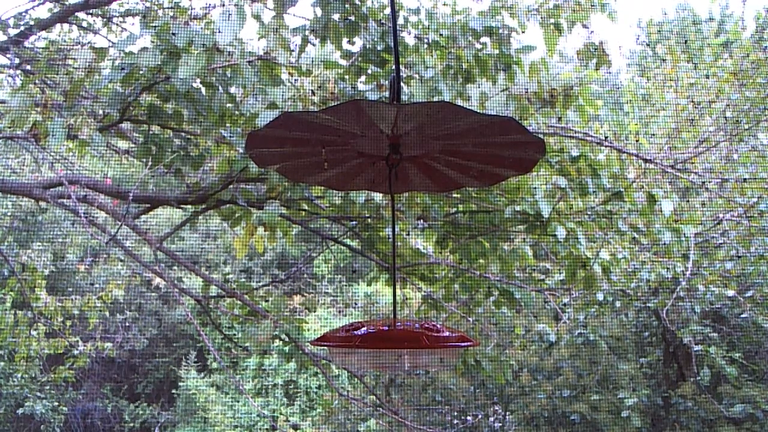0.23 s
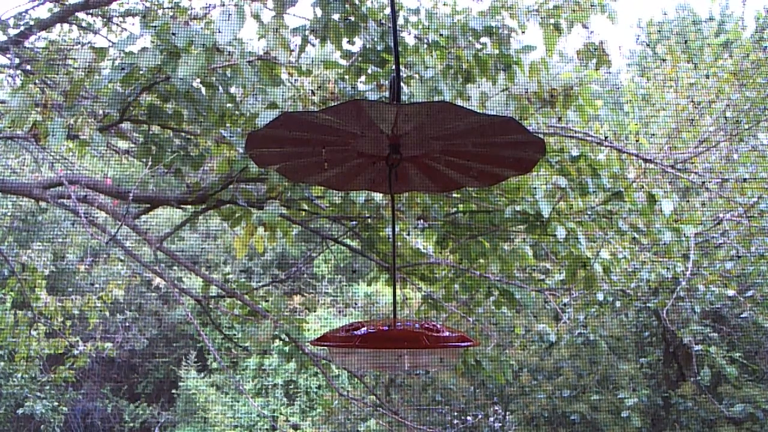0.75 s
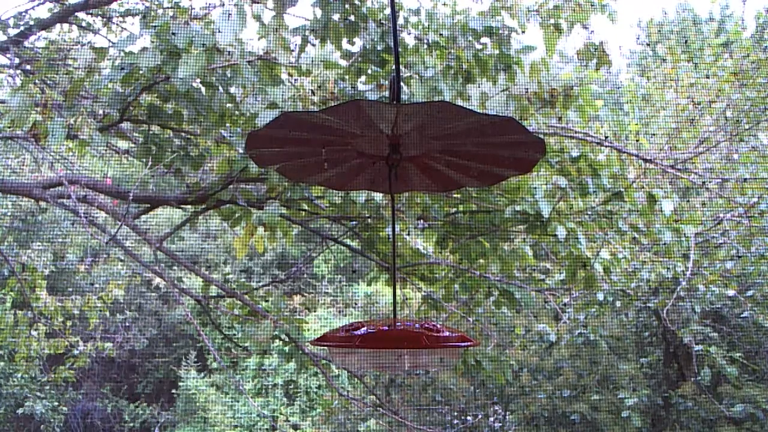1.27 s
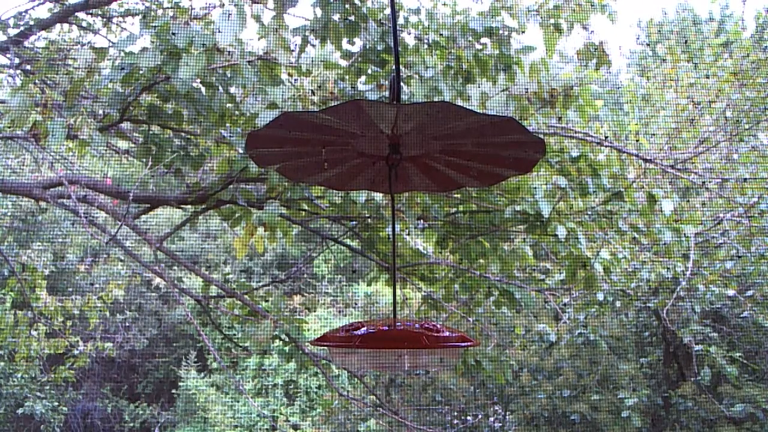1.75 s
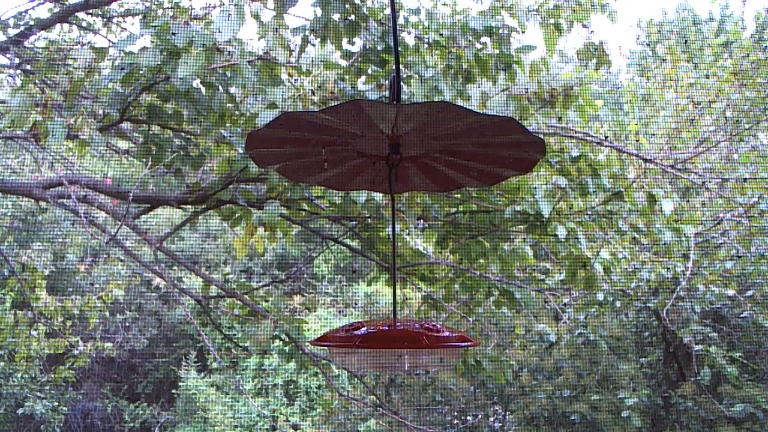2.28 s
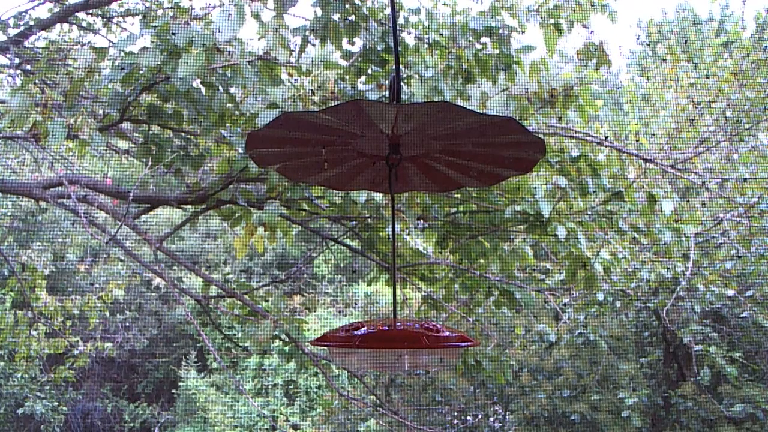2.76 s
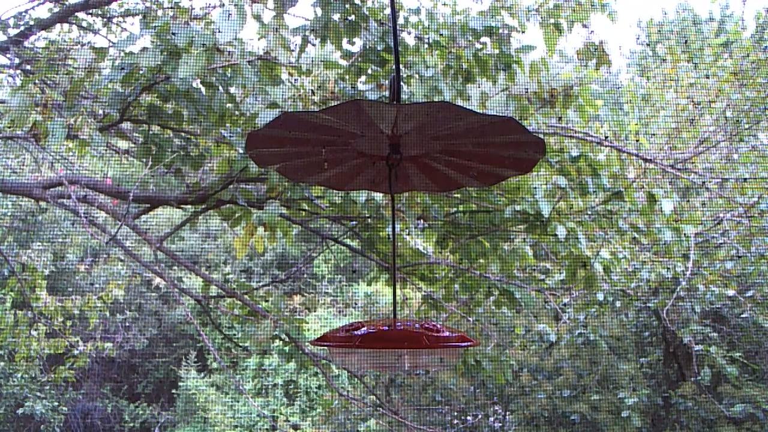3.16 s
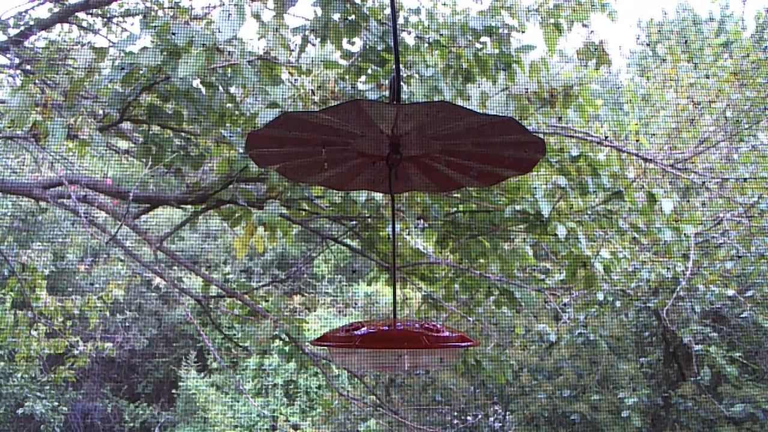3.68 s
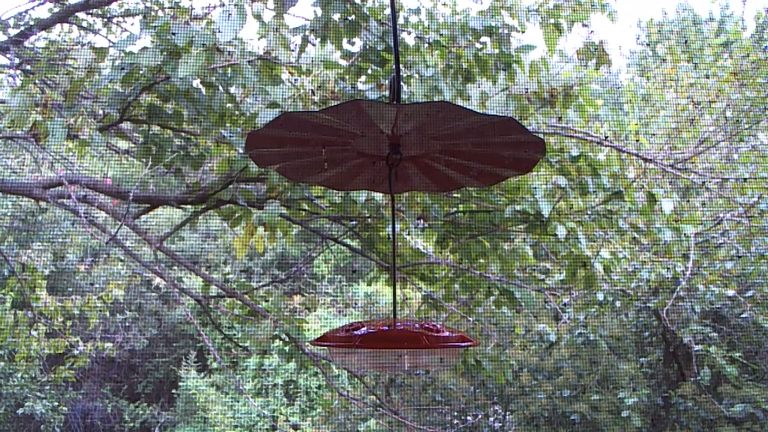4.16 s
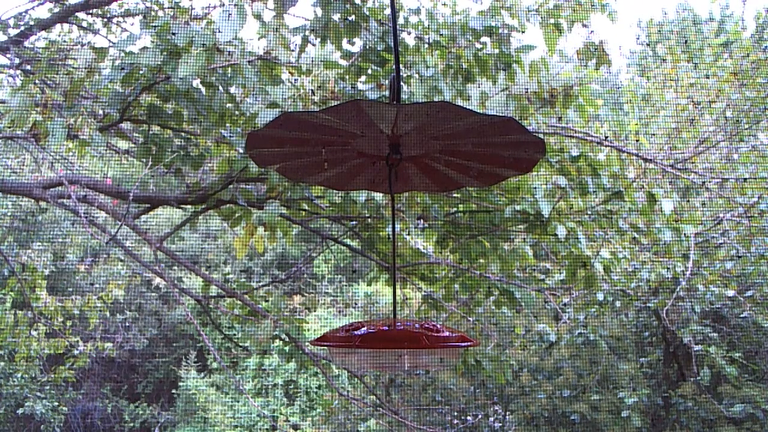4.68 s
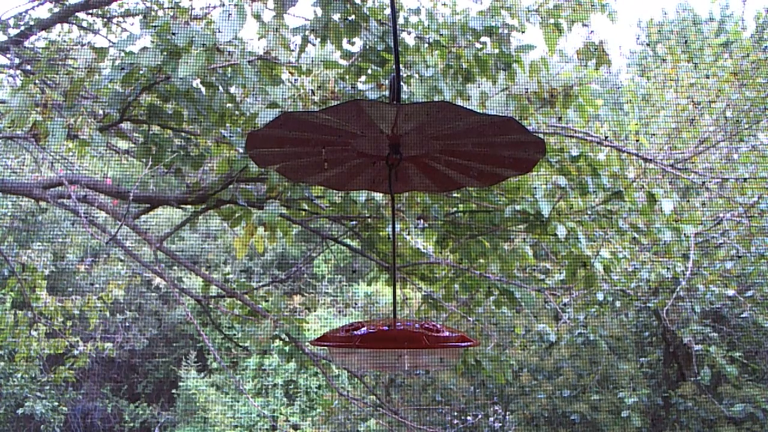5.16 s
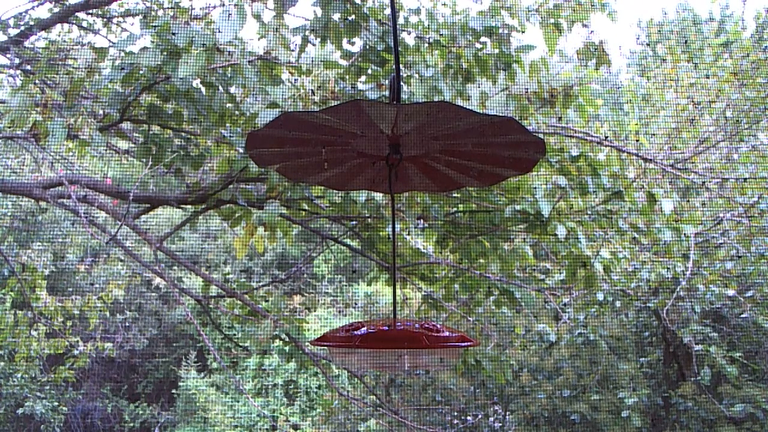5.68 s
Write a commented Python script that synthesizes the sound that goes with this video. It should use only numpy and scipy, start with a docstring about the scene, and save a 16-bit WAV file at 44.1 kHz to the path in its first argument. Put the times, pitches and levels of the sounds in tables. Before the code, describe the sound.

A quiet wooded place in summer, heard in stereo for about six seconds. Throughout, massed cicadas make a steady, thin hiss, strongest around seven kilohertz, with a wider, softer wash of distant insects beneath. From the start a nearer cicada buzzes in rough, rapid throbs, eleven to fourteen a second, weakening until it is gone by about 2.5 seconds. A small bird chips at 0.3, and a dull thump lands at 0.8. Dry wooden knocks begin at 1.5, peak sharply at 1.8 and scatter on to 2.4, where another soft thump falls; leaves blur them slightly. Below lies distant traffic, a low rumble that swells by 1.7 and then flutters unevenly, with a fuzzy engine note, faint hum and open air. A minute tick comes at 4.2, a thin high squeak at 4.6 and a barely audible chip near 5.8. Fine digital grit colours the treble.

```python
"""Among summer trees: cicadas hiss high in two bands over a wavering low rumble and a faint far machine hum.
One nearer cicada throbs and dies away; something wooden knocks, something thumps and a bird chips.
Crowds, traffic and air are shaped noise, the near cicada is clicks through resonances, knocks are rings;
the narrow rumble near 55 Hz is drawn as a tone with random swells, hum and bird are tones.
The recorder's clock drifts and jumps back hundreds of times a second, which ticks in the treble."""
import sys
import numpy as np
from scipy import signal
from scipy.io import wavfile
from scipy.ndimage import uniform_filter1d, map_coordinates

SR = 44100
rng = np.random.default_rng(int(sys.argv[2]) if len(sys.argv) > 2 else 0)


def digitize_waveform(pressure):
    """Quantize a signal to 16-bit integers and store it at the path in sys.argv[1].

    Rows of a 2-D input are taken as channels; values are limited to [-1, 1].
    """
    field = np.atleast_2d(pressure).T
    bounded = np.clip(field, -1, 1)
    quanta = np.round(bounded * 32767).astype(np.int16)
    wavfile.write(sys.argv[1], SR, quanta)


N = 261505


def gain_of(db):
    """Amplitude factor of a level in dB."""
    return 10 ** (np.asarray(db) / 20)


def evened(x):
    """The signal brought to rms 1."""
    return x / np.sqrt(np.mean(x ** 2) + 1e-20)


def read(points, hz):
    """Value of a spectrum table at the frequencies hz."""
    f, value = np.transpose(points)
    return np.interp(np.log(hz + 1), np.log(f + 1), value)


def curve(rows, axis=1):
    """One column of a time table, for every sample."""
    rows = np.array(rows)
    return np.interp(np.arange(N) / SR, rows[:, 0], rows[:, axis])


def drift(per_s):
    """Slow chance of rms 1, changing about per_s times a second."""
    size = max(int(SR / per_s), 1)
    smoothed_once = uniform_filter1d(rng.standard_normal(N), size)
    return evened(uniform_filter1d(smoothed_once, size))


def resonate(x, hz, width):
    """Two-pole resonance of gain 1 at its peak."""
    return signal.lfilter(*signal.iirpeak(hz, hz / width, SR), x)


def wavering(turns, db, waver_db, per_s):
    """A tone along the given cycle count whose level never holds still."""
    level = gain_of(db + waver_db * drift(per_s))
    return np.sqrt(2) * level * np.sin(2 * np.pi * (turns + rng.random()))


def ports(x, lag, pan_db):
    """A single source at the two microphone ports: left late by lag samples and louder by pan_db."""
    return np.array([np.roll(x, round(lag)) * gain_of(pan_db / 2), x * gain_of(-pan_db / 2)])


# likeness of the two microphone ports: (frequency [Hz], left-right likeness [0-1])
PORT_LIKENESS = [(60, .995), (340, .92), (860, .78), (1120, .7), (1400, .53), (1650, .42), (2000, .48),
                 (2400, .42), (2900, .12), (4000, .1), (5000, .38), (6300, .12), (6800, .38), (7500, .3),
                 (9000, .08)]
# phase between the ports: (frequency [Hz], lead of the left [rad])
LEFT_LEAD = [(60, .18), (340, .22), (600, .5), (1120, 1.0), (1640, 1.9), (2150, 3.0), (2670, 3.6),
             (5000, 4.2), (6800, 6.9), (7500, 4.7)]


def wash(spectrum, patchy_db, size=1024):
    """Many far sources at once: random short-time spectra with drifting patches, at rms 1."""
    frames, hz = 4 * N // size + 5, np.fft.rfftfreq(size, 1 / SR)
    a, b, c, d, patches = rng.standard_normal((frames, len(hz), 5)).T
    patches = uniform_filter1d(patches, size=12, axis=0)  # over frequency
    patches = evened(uniform_filter1d(patches, size=14336 // size, axis=1))  # over time
    same = np.clip(read(PORT_LIKENESS, hz), -1, 1)[:, None]
    right = a + 1j * b
    shared = same * right * np.exp(1j * read(LEFT_LEAD, hz))[:, None]
    left = shared + np.sqrt(1 - same ** 2) * (c + 1j * d)
    z = np.array([left, right]) * gain_of(spectrum(hz)[:, None] + patchy_db * patches)
    return evened(signal.istft(z, nperseg=size, noverlap=3 * size // 4)[1][:, :N])


# resonances of the high chorus: (frequency [Hz], width between 9 dB down points [Hz], relative level [dB])
CHORUS_BODIES = [(6808, 680, -1.5), (7292, 620, 0.1)]
# chorus level before the left-right offset: (time [s], level [dB])
CHORUS_LEVEL = [(0, -41.5), (2.6, -42.5), (5.93, -41.5)]
CHORUS_THROB_HZ = 53.6


def chorus():
    """So many bodies click that they blur into a band; its faint fast throb varies in depth."""
    def band(hz):
        power = sum(gain_of(2 * db) / (1 + (2 * (hz - f) / w) ** 2) ** 3 for f, w, db in CHORUS_BODIES)
        return 10 * np.log10(power)
    throb = np.sin(2 * np.pi * (CHORUS_THROB_HZ * np.arange(N) / SR + 0.18 * drift(per_s=1.6)))
    depth = np.array([[.18], [.1]]) * (1 + 0.22 * drift(per_s=5.5))  # left, right
    level_db = curve(CHORUS_LEVEL) + .5 * drift(per_s=9.7) + [[.4], [-.4]]
    return gain_of(level_db) * (1 + depth * throb) * wash(band, patchy_db=-0.45)


# wide far chorus and microphone hiss: (frequency [Hz], relative density [dB per Hz])
FAR_SPECTRUM = [(880, -49), (1500, -21), (2470, -14.5), (2950, -10), (3190, -11.5), (3520, -10),
                (4760, -9.5), (6150, -7), (7120, -8.5), (7550, -5), (8740, -22.5), (10100, -30),
                (15600, -40)]
FAR_DB = -44.5


def far_chorus():
    """Distant cicadas and microphone hiss merge into one wide wash of quickly flickering level."""
    level = gain_of(FAR_DB + 0.53 * drift(per_s=39))
    return level * wash(lambda hz: read(FAR_SPECTRUM, hz), patchy_db=1.1)


# nearer cicada's body: (resonance [Hz], width [Hz], share [dB])
CICADA_BODY = [(2500, 400, -17), (3100, 500, -13), (3530, 130, -10), (3850, 110, -9), (4040, 80, -12),
               (4430, 90, -7), (4750, 260, -3), (5200, 280, -3), (5455, 60, -7), (5680, 200, -5),
               (6240, 80, -11), (4800, 2600, -4), (6400, 900, -7)]
# its effort between throbs: (time [s], level [dB], brightness about 4900 Hz [dB per octave])
CICADA_EFFORT = [(0, -50, -1), (.8, -53.5, 2), (1.6, -57.5, -6), (1.9, -58.5, -3), (2.4, -74.5, -27.5),
                 (2.7, -83, -15)]
# its throbbing: (time [s], rate [throbs per s], mean swell [dB])
CICADA_THROBS = [(0, 10.7, 5.8), (.65, 14.4, 4.4), (.85, 13.88, 4.1), (2.3, 13.88, 6.8)]
FIRST_THROB_S, THROB_S, UNEVEN_DB = 0.0796, 0.01, 1  # first about here; swell's fall to 1/e; its rms variation


def cicada():
    """Uneven tymbal clicks ring the body in throbs; leaves send other clicks to each port."""
    t = np.arange(N) / SR
    rate = curve(CICADA_THROBS)
    turns = np.cumsum(rate) / SR - FIRST_THROB_S * CICADA_THROBS[0][1]
    away_s = (turns - np.round(turns)) / rate  # time from the nearest throb's peak
    peak_db = curve(CICADA_THROBS, axis=2) + UNEVEN_DB * drift(per_s=39)
    swell_db = peak_db * np.exp(-(away_s / THROB_S) ** 2)

    clicks = (rng.random((3, N)) < 5000 / SR) * rng.standard_normal((3, N))
    clicks = 0.84 * ports(clicks[2], lag=2, pan_db=0.5) + clicks[:2]
    click_band = signal.butter(2, [2600, 8000], "band", fs=SR, output="sos")
    clicks = evened(signal.sosfilt(click_band, clicks))

    song = np.zeros((2, N))
    for k, (hz, width, db) in enumerate(CICADA_BODY):
        octaves = np.log2(hz / 4900)
        falling_db = np.interp(t + 0.038 * octaves, t, swell_db)  # each throb starts high and slides down
        level_db = db + curve(CICADA_EFFORT) + curve(CICADA_EFFORT, axis=2) * octaves + falling_db
        own = np.roll(clicks, k * SR // 10, axis=1)  # each resonance gets clicks of its own
        song += gain_of(level_db) * resonate(own, hz, width) * np.sqrt(SR / np.pi / width)
    return song


# knocks on wood: (time [s], direct peak [dB], brightness about 1 kHz [dB per octave], rattle fall to 1/e [s])
WOOD_KNOCKS = [(1.502, -39.5, -0.5, 0.009), (1.78, -32.5, 6.5, 0.0072), (1.8102, -23, 2.5, 0.0025),
               (1.92, -35.5, 2, 0.003), (1.933, -39.5, 1, 0.0065), (2.017, -40, 0, 0.0055),
               (2.056, -41, -1.5, 0.0023), (2.371, -45, -1, 0.0064)]
# modes of the wood: (frequency [Hz], relative level [dB], fall by 60 dB [s])
WOOD_MODES = [(445, -14, .045), (708, -4, .06), (950, -7, .02), (1340, -6, .007), (1700, -5, .008),
              (2200, -5, .006), (2650, -1, .007), (3200, -1, .006), (3730, 1.5, .01), (4500, -4, .006)]
# dull thumps: (time [s], level before onset and decay [dB], pitch [Hz], fall by 60 dB [s])
DULL_THUMPS = [(0.799, -34.5, 135, 0.24), (2.355, -33.5, 131.3, 0.15)]


def knocks():
    """Each knock is a few ms of rattling contact that rings the wood; thumps are one low mode."""
    out, t = np.zeros(N), np.arange(8000) / SR
    chance = rng.standard_normal((len(WOOD_KNOCKS), 900))
    for (s, db, bright_db, length), grit in zip(WOOD_KNOCKS, chance):
        contact = (0.71 * (t[:900] == 0) + 0.83 * grit) * np.exp(-t[:900] / max(length, 1e-4))
        ring = np.zeros(8000)
        for hz, mode_db, t60 in WOOD_MODES:
            ring_db = mode_db + bright_db * np.log2(hz / 1000) - 60 * t / t60
            ring += gain_of(ring_db) * np.sin(2 * np.pi * hz * t)
        blow = np.convolve(contact, ring)[:8000]
        blow = signal.lfilter(*signal.butter(1, 6000, fs=SR), blow)  # a soft contact has little treble
        out[round(s * SR):][:8000] += gain_of(db) * blow / abs(blow).max()
    for s, db, hz, t60 in DULL_THUMPS:
        envelope = gain_of(db - 60 * t / t60) * (1 - np.exp(-t / 0.0092))
        out[round(s * SR):][:8000] += envelope * np.sin(2 * np.pi * hz * t)
    return out


# bird chips and faint thin squeaks, before the mix at the ports:
# (time [s], length [s], level [dB], start [Hz], end [Hz], pitch wobble [share, 0-1])
BIRD_CHIPS = [(.318, 0.056, -52, 2850, 2420, 0.11), (2.03, 0.049, -63, 3500, 3560, 0.08),
              (3.577, 0.053, -65, 2500, 2294, 0.04), (4.617, 0.031, -50, 5550, 6200, 0.07),
              (5.778, 0.043, -64, 2400, 2045, 0.1)]
OVERTONE_DB = -10  # octave above each chip, relative to it


def bird():
    """Short glides with an octave overtone, blurred by a quick wobble of pitch."""
    out = np.zeros(N)
    for s, length, db, start_hz, end_hz, wobble in BIRD_CHIPS:
        n = int(length * SR)
        shake = 1 + wobble * evened(uniform_filter1d(rng.standard_normal(4000), size=40))[:n]
        phase = 2 * np.pi * np.cumsum(np.geomspace(start_hz, end_hz, n) * shake) / SR
        voice = np.sin(phase) + gain_of(OVERTONE_DB) * np.sin(2 * phase)
        out[round(s * SR):][:n] += np.sqrt(2) * gain_of(db) * voice * signal.windows.tukey(n, .4)
    return out


def leaves(x, t60):
    """Short scatter off foliage: dense dying taps of energy about 1, other for each port."""
    taps = rng.standard_normal((2, 6000)) * gain_of(-60 * np.arange(6000) / SR / t60)
    return signal.oaconvolve(x[None], taps / np.linalg.norm(taps[0]), axes=1)[:, :N]


# far traffic: (frequency [Hz], relative density [dB per Hz])
TRAFFIC_SPECTRUM = [(14, -52), (24, -6), (40, -1.5), (62, 3.5), (76, 3.5), (88, -2), (98, -3), (115, -5.5),
                    (145, -11), (170, -14.5), (215, -19), (260, -22.5), (330, -29.5), (500, -52.5)]
# its mean level: (time [s], level [dB])
TRAFFIC_LEVEL = [(0, -46.5), (.6, -42), (.8, -40.5), (1.7, -36.5), (2.7, -40.5), (4.2, -39), (5.93, -39)]


def traffic():
    """Far traffic blurs into a low noise whose level wavers."""
    level = gain_of(curve(TRAFFIC_LEVEL) + 2.0 * drift(per_s=4.4))
    return level * wash(lambda hz: read(TRAFFIC_SPECTRUM, hz), patchy_db=0.3, size=4096)


# one run of random swells and pitch wander of the low rumble noise in a narrow band near 55 Hz,
# before the further chance below: (time [s], level [dB], center [Hz])
NARROW_RUMBLE = [(0.0, -52, 59.34), (0.78, -38, 53.78), (1.22, -33, 52.36), (1.3, -32.5, 57.84),
                 (1.47, -32, 49.24), (1.98, -34, 57.4), (2.64, -33, 58.2), (3.01, -36, 50.3),
                 (3.37, -36, 51.0), (3.57, -38, 58.06), (3.88, -26.5, 55.0), (3.91, -44.5, 53.6),
                 (4.13, -28, 59.26), (4.18, -39, 59.4), (4.36, -35.5, 53.9), (4.49, -52, 56.2),
                 (4.59, -30, 51.06), (4.82, -40, 56.94), (5.15, -31.5, 54.1), (5.27, -43.5, 45.2),
                 (5.51, -32, 52.8), (5.71, -39.5, 48.5), (5.86, -44.5, 62.1), (5.93, -37, 62.7)]
FADING = 0.4  # rms share by which the narrow rumble swells and drops out


def narrow_rumble():
    """Low rumble noise in a narrow band near 55 Hz, drawn as a tone along one run of swells and pitch wander."""
    hz = curve(NARROW_RUMBLE, axis=2) * (1 + 0.047 * drift(per_s=41.0))
    rumble = wavering(np.cumsum(hz) / SR, curve(NARROW_RUMBLE), 1.24, per_s=63)
    return ports(rumble * (1 + FADING * drift(per_s=25.3)), lag=-18, pan_db=-1.3)


# fuzzy far engine note: (time [s], level [dB])
ENGINE_LEVEL = [(0, -54.5), (.6, -55.5), (1.5, -48), (3.1, -49), (4.4, -56.5), (5, -49.5), (5.93, -54)]
ENGINE_HZ, ENGINE_WIDTH_HZ = 171.9, 23.6  # width of each of the two resonances


def engine():
    """A far engine's fuzzy note: noise through the same narrow resonance twice."""
    once = resonate(rng.standard_normal(N), ENGINE_HZ, ENGINE_WIDTH_HZ)
    fuzz = resonate(once, ENGINE_HZ, ENGINE_WIDTH_HZ)
    return ports(gain_of(curve(ENGINE_LEVEL)) * evened(fuzz), lag=3, pan_db=0.3)


# steady wash of air: (frequency [Hz], relative density [dB per Hz])
AIR_SPECTRUM = [(120, -28.5), (200, -0.5), (265, -3), (373, -13.5), (401, -9), (479, -14), (689, -15),
                (773, -16.5), (840, -16), (885, -18), (961, -14), (1550, -23.5), (2400, -25), (3120, -75),
                (5280, -120)]
AIR_DB = -49.5


def air():
    """Open air around the microphone: a nearly steady noise, strongest in the low middle."""
    level = gain_of(AIR_DB + 0.2 * drift(per_s=1.8))
    return level * wash(lambda hz: read(AIR_SPECTRUM, hz), patchy_db=0.7)


# far motor's mean fundamental, not itself sounded: (time [s], frequency [Hz])
HUM_PITCH = [(0, 117), (5.93, 118)]
# its multiples, before panning: (order, level [dB])
HUM_MULTIPLES = [(3, -69), (6, -72), (7, -67.5), (8, -65)]
# other thin tones of steady pitch, before panning: (frequency [Hz], level [dB])
THIN_TONES = [(1147, -72), (1351, -74.5)]


def hum():
    """Multiples of a far motor and two thin tones of steady pitch."""
    t = np.arange(N) / SR
    turns = np.cumsum(curve(HUM_PITCH) * (1 + 0.002228 * drift(per_s=7.0))) / SR
    lines = [(k * turns, db) for k, db in HUM_MULTIPLES] + [(hz * t, db) for hz, db in THIN_TONES]
    tones = sum(wavering(cycles, db, 1.5, per_s=10) for cycles, db in lines)
    return ports(tones, lag=-4.0, pan_db=2.8)


def scene():
    """All sources at the two ports; knocks and bird arrive both directly and scattered by leaves."""
    wood, chips = knocks(), bird()
    wood_heard = ports(wood, lag=-1, pan_db=0.0) + 1.4 * leaves(wood, t60=0.17)
    bird_heard = 1.2 * ports(chips, lag=1.7, pan_db=-4.0) + 1.65 * leaves(chips, t60=0.079)
    cicadas = chorus() + far_chorus() + cicada()
    background = traffic() + narrow_rumble() + engine() + air() + hum()
    return cicadas + wood_heard + bird_heard + background


# one faint tick, before the band limit: (time [s], level [dB])
TICK = (4.2358, -31)
SLIPS_PER_S, SLOWING_PER_S = 522, .1037  # jumps back a second at the start; exponential slowing rate [1/s]
EDGE_HZ = 15740  # top of the recorder's band


def record(dry):
    """The clock gains on the sound until it jumps back by about a sample, ever less often; then the band limit."""
    slips_per_s = SLIPS_PER_S * np.exp(-SLOWING_PER_S * np.arange(N) / SR)
    ahead = np.cumsum(slips_per_s) / SR % 1
    places = np.arange(N) + 0.88 * ahead  # in samples
    slipped = np.array([map_coordinates(x, [places], order=5, mode="mirror") for x in dry])
    tick_s, tick_db = TICK
    slipped[:, round(tick_s * SR):][:, :3] += gain_of(tick_db) * np.array([1, -1, 0])
    band_limit = signal.firwin(1023, EDGE_HZ, window=("kaiser", 9), fs=SR)
    return signal.oaconvolve(slipped, band_limit[None], "same")


dry = scene()
out = record(dry)
digitize_waveform(out)
```